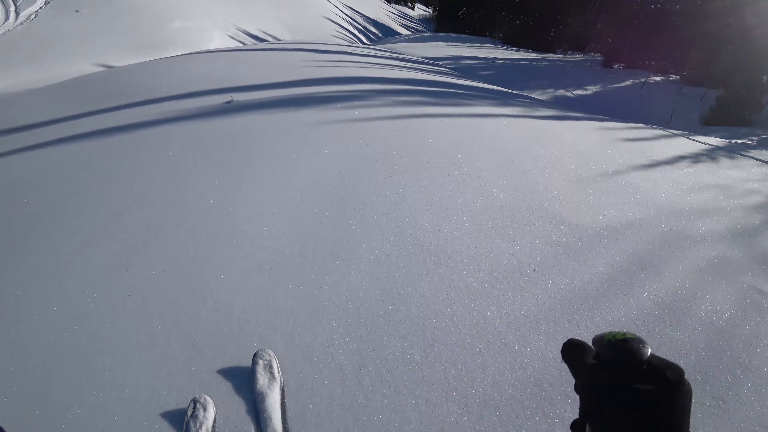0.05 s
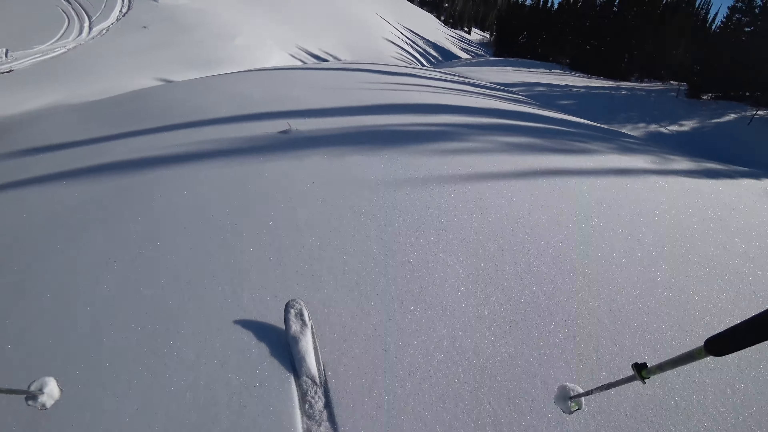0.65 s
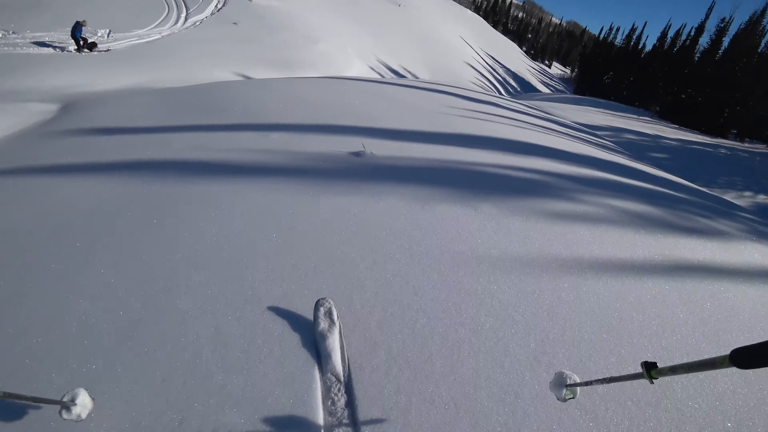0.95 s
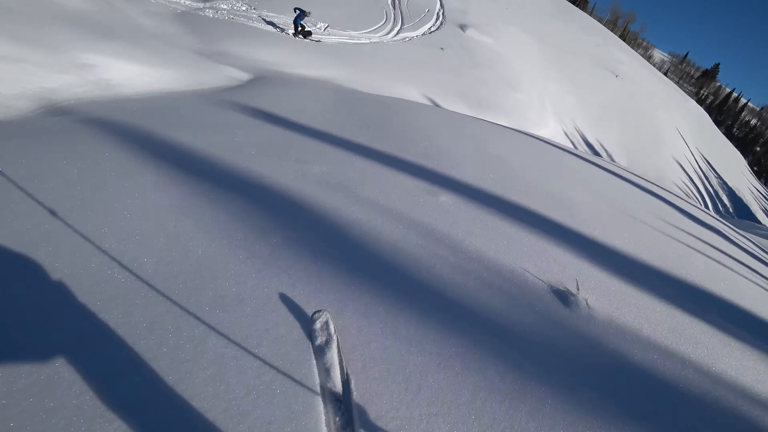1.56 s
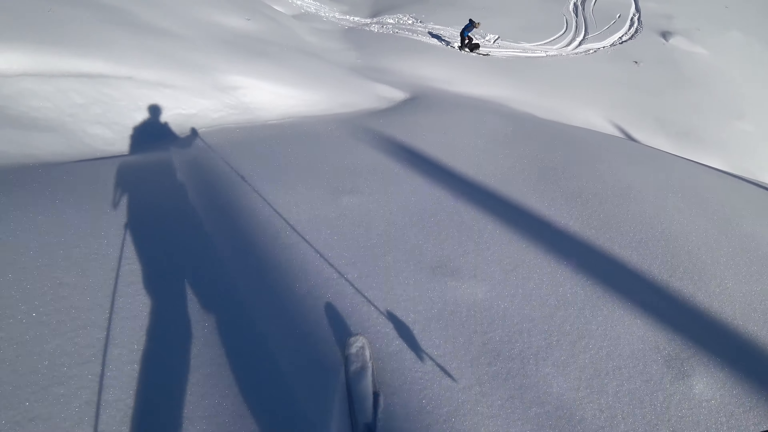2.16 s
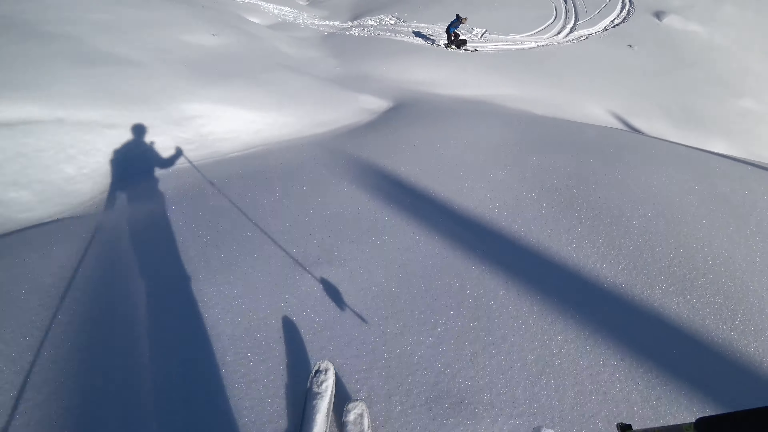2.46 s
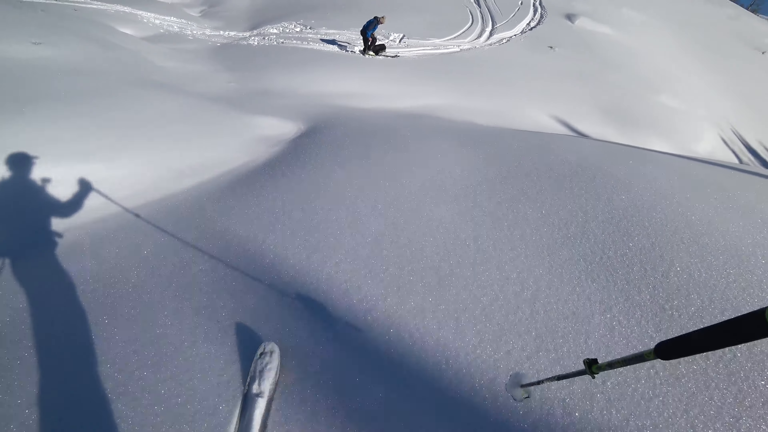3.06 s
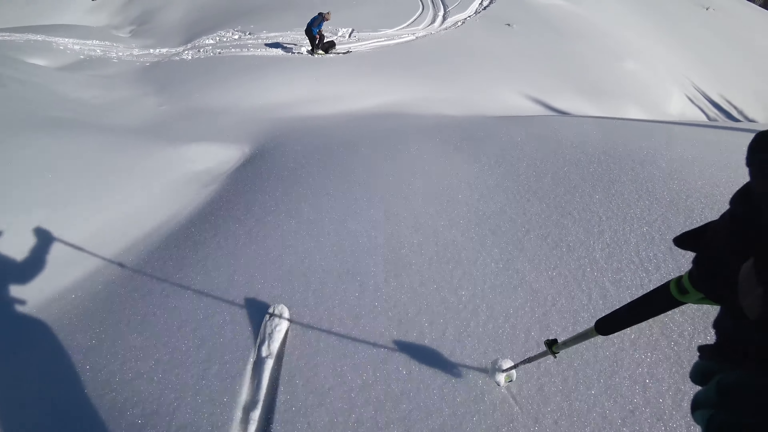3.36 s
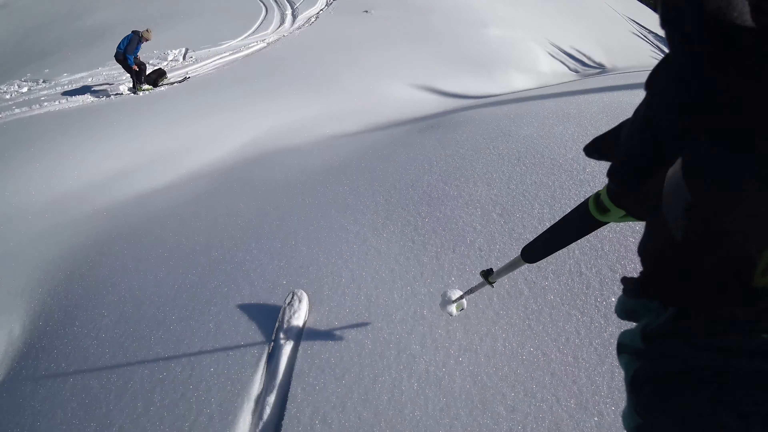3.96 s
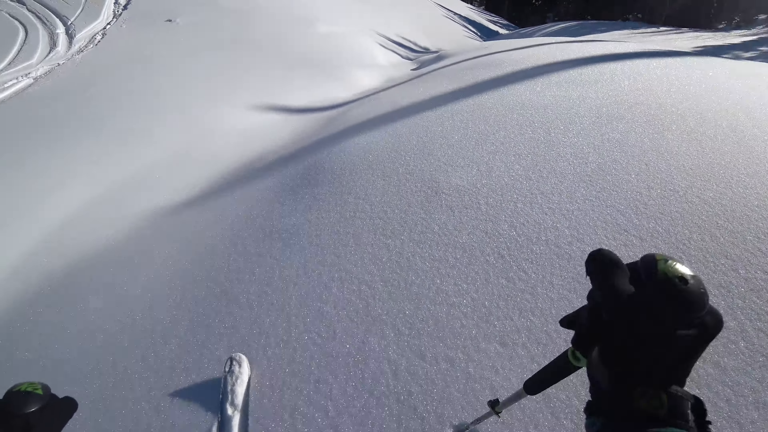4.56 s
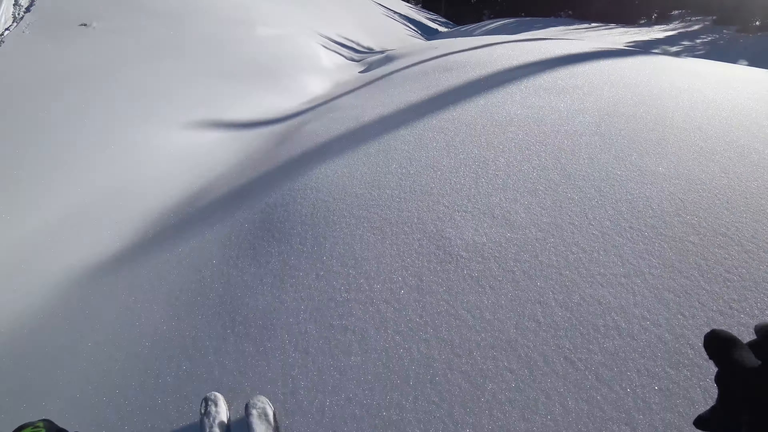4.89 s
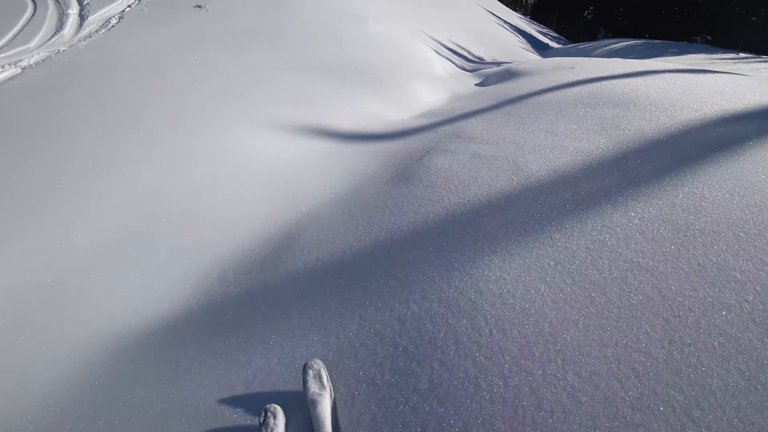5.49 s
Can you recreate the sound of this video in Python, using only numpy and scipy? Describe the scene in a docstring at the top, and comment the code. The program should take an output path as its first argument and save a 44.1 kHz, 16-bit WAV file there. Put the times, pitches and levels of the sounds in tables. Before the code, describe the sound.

Skis crunch softly and hiss through deep powder in slow turns, with a few small ticks from boots and bindings.

```python
"""Skis link slow turns through deep powder on an open slope, heard at a microphone worn by the skier.
The snow compacts in countless small fractures, a soft crunch, while loose crystals hiss along the skis
and spray up, most of all in the first turn. Faint wind brushes the microphone's two ports.
Boots and bindings tick, now and then a ski knocks dully on a lump, and at the change of edges
a boot shell creaks by stick-slip friction."""
import sys
import numpy as np
from scipy import signal
from scipy.fft import rfft, irfft
from scipy.io import wavfile
from scipy.ndimage import uniform_filter1d

SR = 44100
rng = np.random.default_rng(int(sys.argv[2]) if len(sys.argv) > 2 else 0)


def digitize_waveform(pressure):
    """Quantize a signal to 16-bit integers and store it at the path in sys.argv[1].

    Rows of a 2-D input are taken as channels; values are limited to [-1, 1].
    """
    field = np.atleast_2d(pressure).T
    bounded = np.clip(field, -1, 1)
    quanta = np.round(bounded * 32767).astype(np.int16)
    wavfile.write(sys.argv[1], SR, quanta)


N = 248263
TIME = np.arange(N) / SR
FRAME_S = np.arange(N // 128 + 6) * 128 / SR
BIN_HZ = np.fft.rfftfreq(512, 1 / SR)

# in a turn the edges dig in briefly, spray flies for a while, and the skier leans and rises again
DIG_ATTACK_S, DIG_HOLD_S, DIG_RELEASE_S = 0.55, 0.027, 0.33
SPRAY_ATTACK_S, SPRAY_HOLD_S, SPRAY_RELEASE_S = 0.38, 0.67, 0.61
LEAN_ATTACK_S, LEAN_RELEASE_S = 0.57, 0.42


def gain_of(db):
    """Amplitude ratio: a factor of ten per 20 dB."""
    return 10 ** (np.asarray(db) / 20)


def unit_rms(x):
    """Normalisation to a mean square of one."""
    return x / np.sqrt(np.mean(x ** 2) + 1e-20)


def spectrum_at(points, hz):
    """Linear interpolation on a logarithmic frequency axis."""
    f, value = np.transpose(points)
    return np.interp(np.log(hz + 1), np.log(f + 1), value)


def follow(rows, t):
    """Linear interpolation of each column at the times t."""
    s, *columns = np.transpose(rows)
    return [np.interp(t, s, c) for c in columns]


def add(mix, s, sound):
    """Superposition: a sound joins the mix at the time s."""
    part = mix[max(round(s * SR), 0):][:len(sound)]
    part += sound[:len(part)]


def in_band(shape, lo_hz, hi_hz):
    """Power normalisation: white noise through each frame's spectrum has rms 1 within the band."""
    inside = (BIN_HZ >= lo_hz) & (BIN_HZ <= hi_hz)
    return shape / np.sqrt(np.mean(shape ** 2 * inside, axis=-1, keepdims=True))


def patches(frames, bins):
    """Moving averages of noise give smooth unevenness in time and frequency, of rms 1."""
    field = rng.standard_normal((len(FRAME_S), len(BIN_HZ)))
    return unit_rms(uniform_filter1d(uniform_filter1d(field, frames, axis=0), bins, axis=1))


def wobble(t, top_hz):
    """Sines of random phase, spread over two octaves, sum to a slow fluctuation of rms 1."""
    rates = top_hz * np.geomspace(0.25, 1, 20)
    return unit_rms(sum(np.sin(2 * np.pi * (rate * t + rng.random())) for rate in rates))


def turning(t, attack_s, release_s, hold_s=None):
    """Trapezoidal envelopes: each turn's effects swell, hold (by default as long as the lean) and fade."""
    # edges fully set t/s, lean duration/s, crunch lift/dB, bite/dB, spray share, leftward sway/dB,
    # wind change/dB; bite and sway are before frequency weighting; the last turn is light, unweighted
    turns = [(0.72, 1.45, 1.4, 0, 0.55, -1, -12), (3.33, 0.5, 3, 2.9, 0.04, 1.1, 1),
             (5.8, 0.5, -2, -4.5, 0.3, -2, -6)]
    total = 0
    for s, lean_s, *amounts in turns:
        corners = np.cumsum([-attack_s, attack_s, lean_s if hold_s is None else hold_s, release_s])
        envelope = np.interp(t - s, corners, [0, 1, 1, 0])
        total = total + np.multiply.outer(amounts, envelope)
    return dict(zip(["crunch_db", "bite_db", "spray", "left_db", "wind_db"], total))


def grains(per_s, spread_db, share):
    """Shot noise: tiny events merge into Gaussian noise; larger, separate ones carry a share of the power."""
    size = gain_of(spread_db * np.minimum(rng.exponential(1, N), 4))
    snaps = size * (rng.random(N) < per_s / SR) * rng.choice([-1, 1], (2, N))
    return np.sqrt(share) * unit_rms(snaps) + np.sqrt(1 - share) * rng.standard_normal((2, N))


def at_ports(pair, shape, upright_left_db=0.3):
    """Partial coherence: two noises, coloured by shape, blend into ports differing in level and phase."""
    # likeness of the two ports: f/Hz, correlation
    correlation = [(30, 0.78), (200, 1), (330, 0.95), (770, 1), (1200, 0.9), (1800, 0.9), (2700, 0.95),
                   (4200, 0.99), (6400, 0.98), (9800, 0.97), (15000, 0.88)]
    # left minus right: f/Hz, level/dB
    level_difference = [(300, 0.1), (700, 1), (1200, 2), (1900, 1), (3100, 1.5), (4200, 1.5), (6400, 2),
                        (8600, 1.8), (10500, 0.8), (15000, 1.2)]
    # left minus right: f/Hz, phase/rad
    phase_difference = [(100, 0.12), (600, -0.35), (1400, -0.34), (1900, -0.16), (3500, -0.19),
                        (16000, -0.06)]
    # long waves diffract round the housing, so mainly the treble moves sideways: f/Hz, weight
    sway_weight = [(500, 0.1), (1200, 1.4), (2000, 0.75), (5000, 0.59), (12000, 1.5)]
    left, other = signal.stft(pair, nperseg=512, noverlap=384)[2].transpose(0, 2, 1)
    frames = len(left)
    same = np.clip(spectrum_at(correlation, BIN_HZ), -1, 1)
    right = same * left + np.sqrt(1 - same ** 2) * other
    sway_db = upright_left_db + turning(FRAME_S[:frames, None], LEAN_ATTACK_S, LEAN_RELEASE_S)["left_db"]
    left_db = spectrum_at(level_difference, BIN_HZ) + sway_db * spectrum_at(sway_weight, BIN_HZ)
    side = gain_of(left_db / 2) * np.exp(0.5j * spectrum_at(phase_difference, BIN_HZ))
    spectra = np.array([left * side, right / side]) * shape[:frames]
    return signal.istft(spectra.transpose(0, 2, 1), nperseg=512, noverlap=384)[1][:, :N]


def crunch(level_db=-43.0, flat_bite_db=-1.0, scrape_release_s=1.9, spray_relief_db=-0.5,
           run_in_db=-2, run_in_s=0.45, lumpy_db=0.23, patchy_db=0.58, groove_half_width_hz=170):
    """Brittle fracture of snow under the skis; biting edges brighten it and the groove resonates."""
    # spectrum of packing snow: f/Hz, relative density level/dB
    packing = [(25, -41), (60, -45), (120, -37.5), (200, -18.5), (300, -12.5), (450, -2.5), (650, -2.1),
               (900, 0), (1350, -1.35), (1800, -3), (2600, -7), (4000, -14), (8000, -33)]
    # hollow note of the groove that the skis cut: t/s, f/Hz, lift/dB
    groove = [(0, 1350, 0.5), (.6, 1400, 3.5), (1.8, 1330, 2), (2.95, 1480, 2), (3.4, 1060, 2),
              (4.48, 1010, 4), (4.7, 880, 0.5), (5.63, 1220, 2.5)]
    t = FRAME_S[:, None]
    dig_db = turning(t, DIG_ATTACK_S, DIG_RELEASE_S, DIG_HOLD_S)["crunch_db"]
    thrown = turning(t, SPRAY_ATTACK_S, SPRAY_RELEASE_S, SPRAY_HOLD_S)["spray"]
    press_db = level_db + dig_db + lumpy_db * wobble(t, top_hz=6)
    press_db += spray_relief_db * thrown  # snow thrown aside is not packed
    press_db += run_in_db * np.exp(-t / run_in_s)  # the skis sink in as the run begins
    bite_db = flat_bite_db + turning(t, DIG_ATTACK_S, scrape_release_s, DIG_HOLD_S)["bite_db"]
    bright_db = bite_db * spectrum_at([(900, 0.16), (2400, 0.84)], BIN_HZ)
    groove_hz, lift_db = follow(groove, t)
    groove_db = lift_db / (1 + ((BIN_HZ - groove_hz) / groove_half_width_hz) ** 2)
    colour_db = spectrum_at(packing, BIN_HZ) + bright_db + groove_db
    shape = in_band(gain_of(colour_db), lo_hz=400, hi_hz=1700)
    shape *= gain_of(press_db + patchy_db * patches(frames=7, bins=12))
    return at_ports(grains(per_s=1100, spread_db=3.0, share=0.29), shape)


def hiss(trim_db=-0.11, fizz_db=-0.1, easy_glide_db=-38, fizz_per_db=0.28, glide_spray=0.14,
         patchy_db=0.58):
    """Sliding friction of loose crystals along the skis; thrown spray moves the spectral peak upward."""
    # how hard the skis plough through loose snow: t/s, level/dB
    ploughing = [(0, -39.5), (0.14, -40), (0.29, -41.3), (0.54, -38), (0.73, -38), (0.93, -36), (1.2, -37),
                 (1.4, -37), (1.75, -37.5), (2.4, -40), (2.6, -43.5), (3.12, -39.5), (3.37, -38),
                 (3.82, -40.5), (4.04, -38.5), (4.3, -40.5), (4.9, -41), (5.63, -43)]
    # spectra of gliding and of spraying snow: f/Hz, relative density level/dB
    gliding = [(500, -28.5), (2000, -6), (3100, -4.5), (4100, -3.5), (5000, -3), (6200, -0.5), (7300, 1.5),
               (8300, -0.4), (9100, -4), (10200, -5), (11600, -5), (13200, -3), (14200, -2), (15700, -3.5)]
    spraying = [(500, -32.5), (2000, -11.5), (3200, -8.5), (4700, -7.5), (6000, -4.5), (7100, -1.5),
                (8200, 2), (9100, 0), (9800, 1), (10500, -3), (11600, -8.5), (12900, -4), (14400, -3.5),
                (15700, -4)]
    t = FRAME_S[:, None]
    hiss_db, = follow(ploughing, t)
    turn_spray = turning(t, SPRAY_ATTACK_S, SPRAY_RELEASE_S, SPRAY_HOLD_S)["spray"]
    thrown = np.clip(glide_spray + turn_spray, 0, 1)
    colour_db = (1 - thrown) * spectrum_at(gliding, BIN_HZ) + thrown * spectrum_at(spraying, BIN_HZ)
    # the finest crystals fly only when the skis plough hard
    fine_db = fizz_db + fizz_per_db * (hiss_db - easy_glide_db)
    colour_db += fine_db * spectrum_at([(6500, 0), (11000, 1)], BIN_HZ)
    shape = in_band(gain_of(colour_db), lo_hz=3500, hi_hz=8500)
    shape *= gain_of(hiss_db + trim_db + patchy_db * patches(frames=10, bins=20))
    return at_ports(grains(per_s=6000, spread_db=2.0, share=0.077), shape)


def wind(level_db=-67.0, gusty_db=3.0, shared=0.33, shelter_lag_s=0.45, slowing_db_per_s=1.3):
    """Turbulence at the ports, partly coherent, eases as the skier slows and turns out of the wind."""
    # spectrum of the gusts: f/Hz, relative density level/dB
    gusts = [(20, -13), (60, -1.5), (110, 0.5), (200, 5.5), (400, -0.5), (1000, -34)]
    colour = gain_of(spectrum_at(gusts, np.fft.rfftfreq(N, 1 / SR)))
    air = irfft(rfft(rng.standard_normal((2, N))) * colour, N)
    shelter_db = turning(TIME - shelter_lag_s, LEAN_ATTACK_S, LEAN_RELEASE_S)["wind_db"]
    wind_db = level_db + shelter_db - slowing_db_per_s * TIME + gusty_db * wobble(TIME, top_hz=8)
    return unit_rms(air + shared * air[::-1]) * gain_of(wind_db)


def ticks(t60_s=0.0037, rise_s=0.00021, body=0.53, echo=0.21, echo_s=0.00157):
    """Damped free vibration of snapping plastic in two modes, with a reflection off the skier."""
    # snaps of boots and bindings: t/s, level/dB, nominal f/Hz (between the two modes)
    snaps = [(.131, -30, 1900), (.1485, -25.5, 1750), (0.248, -23.5, 1300), (0.278, -30, 1650),
             (0.324, -26.5, 1550), (0.8783, -23, 2080), (2.468, -23, 1850), (2.483, -24, 2800),
             (2.503, -20, 2800), (2.5364, -27, 3080), (4.894, -25.5, 3700)]
    out, t = np.zeros(N), np.arange(SR // 50) / SR
    for s, db, hz in snaps:
        ring = np.sin(2 * np.pi * hz * 1.12 * t) + body * np.sin(2 * np.pi * hz * 0.82 * t)
        tick = ring * gain_of(-60 * t / t60_s) * (1 - np.exp(-t / rise_s))
        tick = gain_of(db) * tick / abs(tick).max()
        add(out, s, tick)
        add(out, s + echo_s, echo * tick)
    return out


def knocks(swell_s=0.0041, edge_ratio=1.65):
    """Cushioned impact: snow pushes against the ski in a short, dull burst of band-limited noise."""
    # lumps of firmer snow: t/s, level/dB, centre f/Hz
    lumps = [(0.878, -40, 850), (2.748, -65, 120), (3.879, -61.5, 110), (4.8933, -38, 725),
             (5.168, -58, 170)]
    out, t = np.zeros(N), np.arange(SR // 12) / SR
    envelope = t / swell_s * np.exp(1 - t / swell_s)
    for s, db, hz in lumps:
        band = signal.butter(2, [hz / edge_ratio, hz * edge_ratio], "band", fs=SR, output="sos")
        noise = signal.sosfilt(band, rng.standard_normal(2 * len(t)))
        push = unit_rms(noise[len(t):])  # once the filter has settled
        add(out, s, gain_of(db) * push * envelope)
    return out


def creak(jitter=0.24, uneven_db=0.2):
    """Stick-slip friction: the flexing boot shell slips unevenly, and each slip excites its modes."""
    # flexing of the boot: t/s, level/dB, slip rate/Hz
    flex = [(2.3, -56, 100), (2.33, -42, 125), (2.37, -41, 135), (2.41, -43, 140), (2.435, -49, 120),
            (2.47, -47, 120), (2.49, -57, 90)]
    # modes of the shell: f/Hz, level/dB, T60/s
    modes = [(684, -5, 0.015), (1010, 2, 0.009), (2100, 2.5, 0.012), (2450, -1, 0.02)]
    t = np.arange(SR // 40) / SR
    level_db, per_s = follow(flex, TIME)
    wander = unit_rms(uniform_filter1d(rng.standard_normal(N), size=200))
    slip_count = np.floor(np.cumsum(per_s * np.exp(jitter * wander)) / SR)
    slips = np.diff(slip_count, prepend=0) * gain_of(-uneven_db * rng.standard_normal(N))
    ring = sum(gain_of(db - 60 * t / t60) * np.sin(2 * np.pi * hz * t) for hz, db, t60 in modes)
    flexing = (TIME > flex[0][0]) & (TIME < flex[-1][0])
    return unit_rms(signal.oaconvolve(slips, ring)[:N]) * gain_of(level_db) * flexing


def radiated(x, corner_hz=600):
    """Radiation efficiency: parts small against the wavelength give off almost no bass."""
    return signal.sosfilt(signal.butter(2, corner_hz, "high", fs=SR, output="sos"), x)


def scene(gear_pan_db=1.6):
    """Free-field superposition of snow, wind and gear, the gear a little to the left."""
    gear = radiated(ticks() + creak()) + knocks()
    pan = gain_of([[gear_pan_db], [-gear_pan_db]])
    return crunch() + hiss() + gear * pan + wind()


def record(dry, edge_hz=15850):
    """Band limiting: a steep linear-phase low-pass removes the highest treble."""
    low_pass = signal.firwin(701, edge_hz, window=("kaiser", 8), fs=SR)
    return signal.oaconvolve(dry, low_pass[None], "same")


dry = scene()
out = record(dry)
digitize_waveform(out)
```